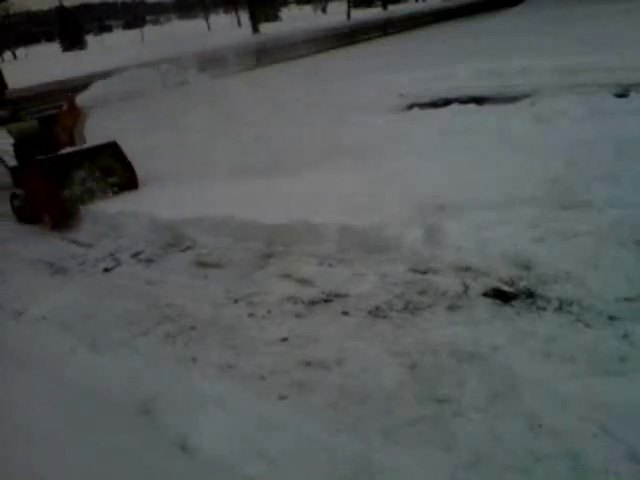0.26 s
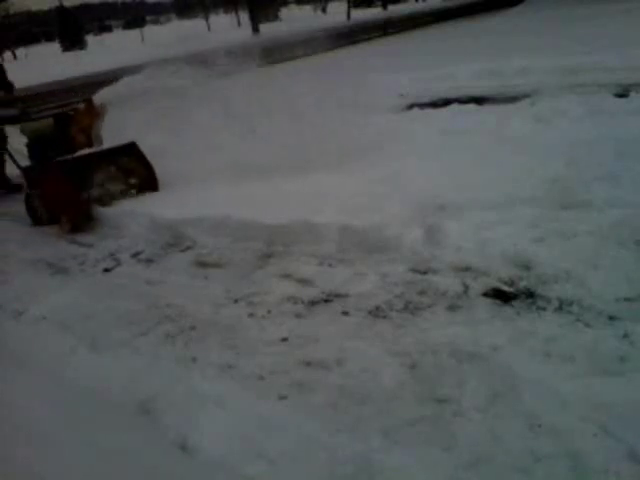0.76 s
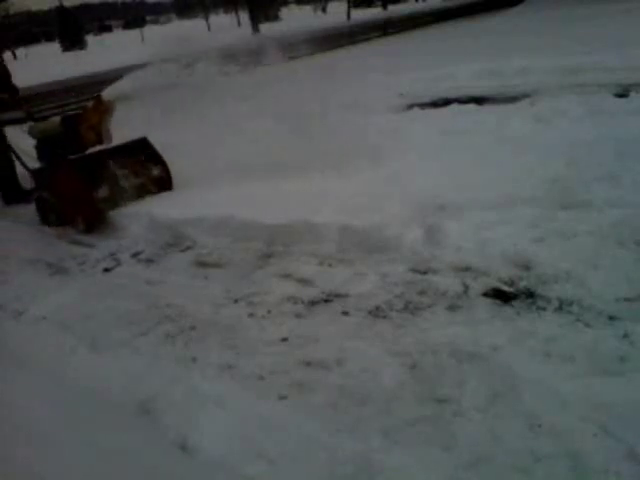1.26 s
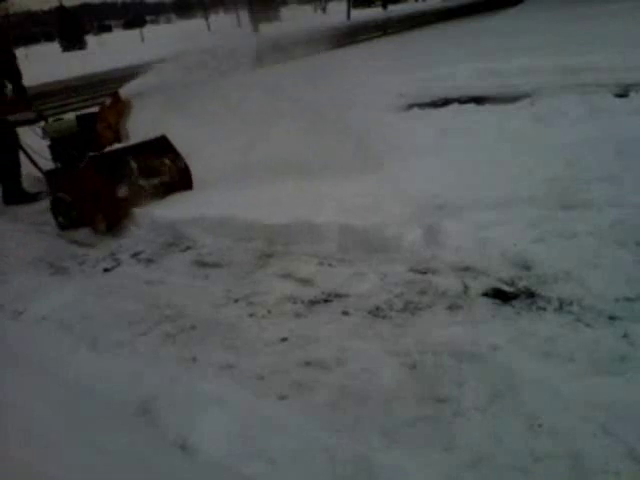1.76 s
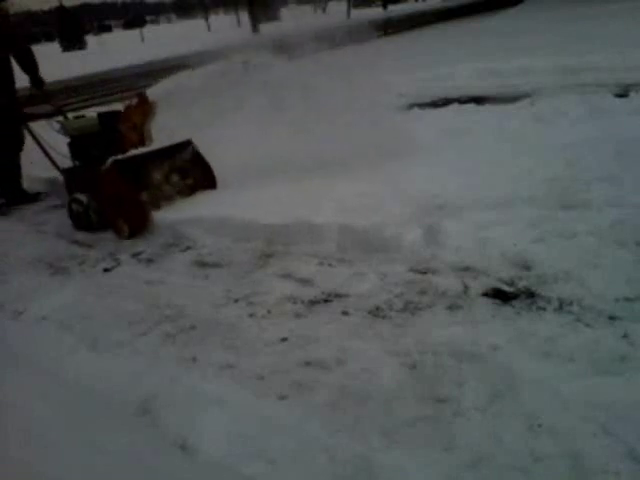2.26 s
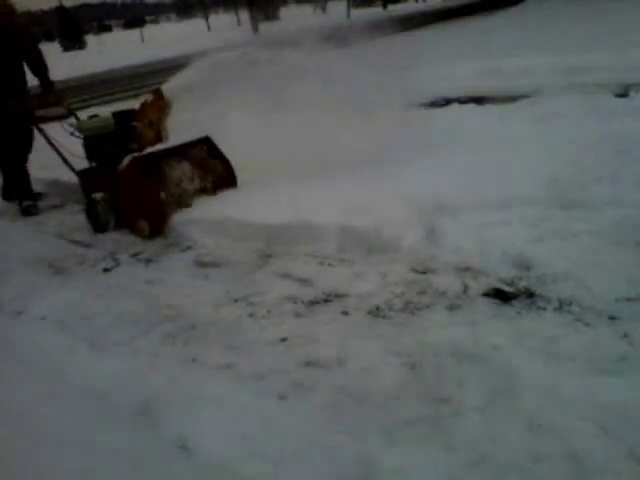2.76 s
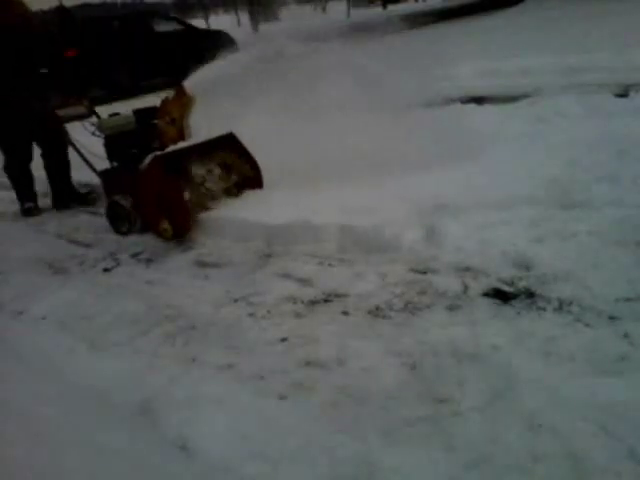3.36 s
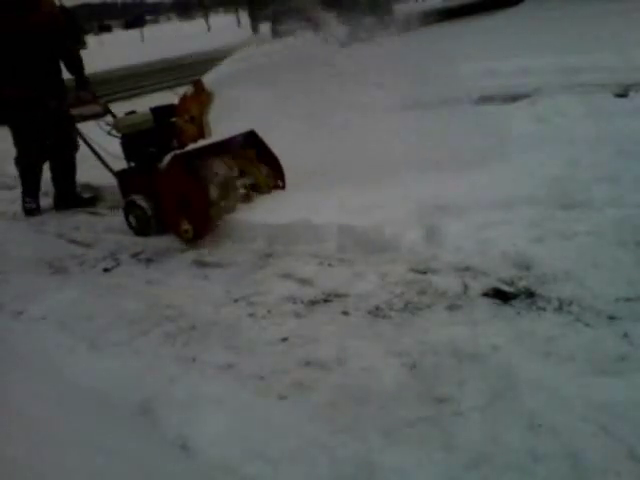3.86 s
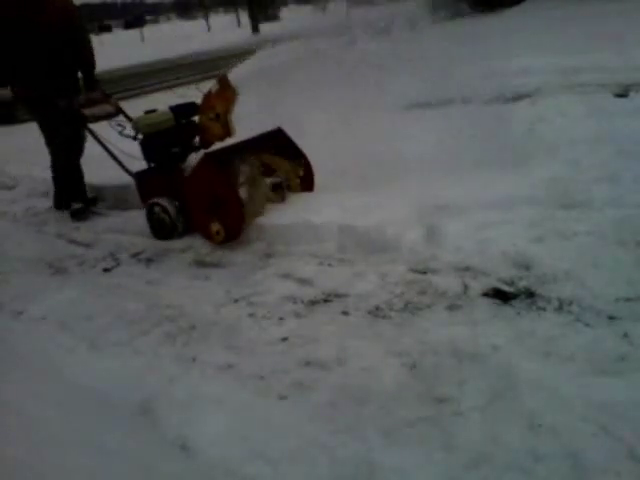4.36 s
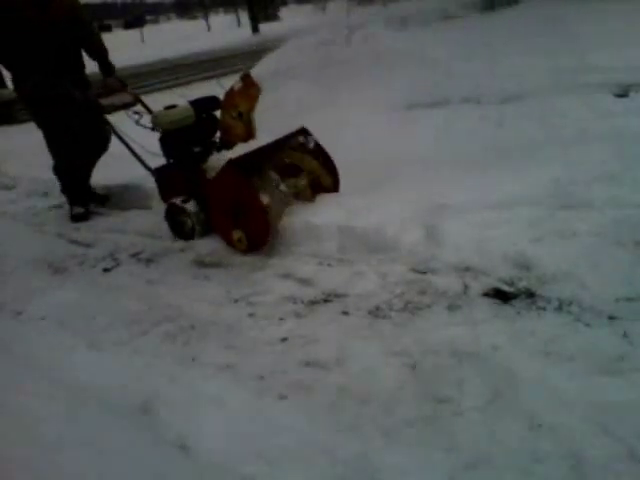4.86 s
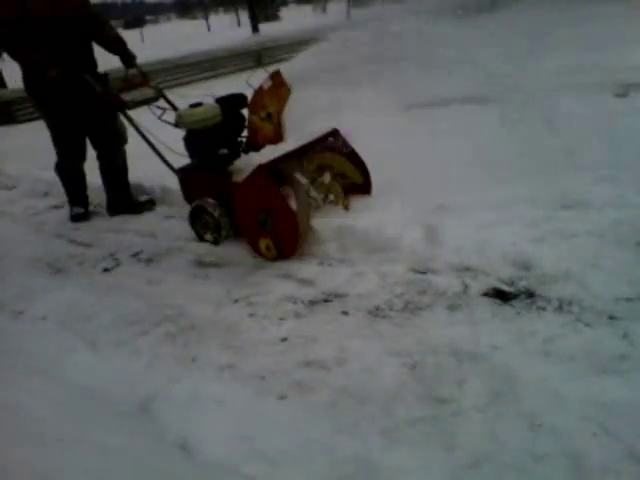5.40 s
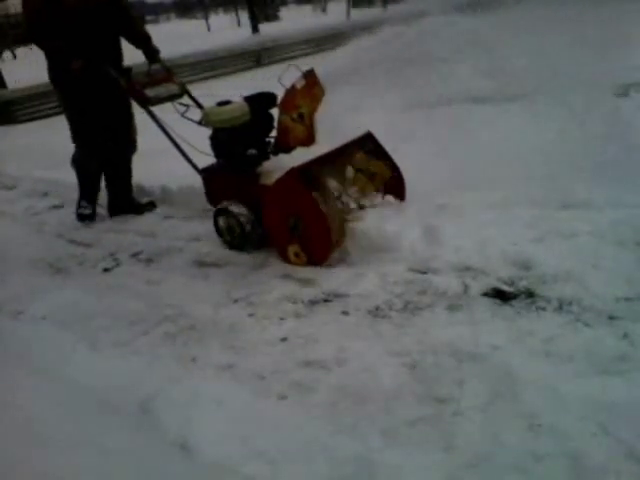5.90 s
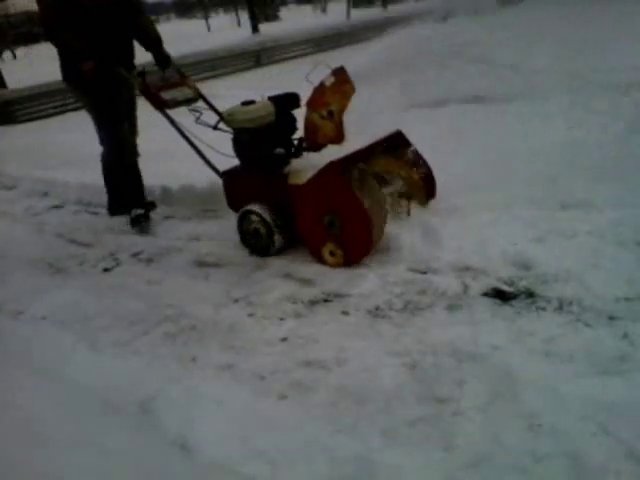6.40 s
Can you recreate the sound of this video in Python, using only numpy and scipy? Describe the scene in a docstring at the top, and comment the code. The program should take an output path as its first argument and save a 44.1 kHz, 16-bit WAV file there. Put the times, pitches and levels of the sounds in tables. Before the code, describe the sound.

A snowblower runs outdoors for the whole six and a half seconds, with no echo and slightly dull treble. Its one-cylinder petrol engine chugs rapidly, with bright valve clatter and a low hum, its speed wavering slightly at first. Snow continuously rumbles in the auger, drums on the steel housing and hisses from the chute, over faint scraping and irregular thuds of lumps. Ice cracks against the steel right at the start, then in a ringing cluster from 0.6 to 0.9 seconds, with lighter clicks until 1.4. A soft gust brushes the microphone around 1.7 seconds. From about 2 seconds the machine grows louder as it approaches, and the engine steadies by 4. Sharp ice clinks come near 2.9 and 4 seconds. The closer machine then ploughs on through thumping lumps, with a few bright snaps of grit around 6 seconds, still running at the end.

```python
"""A two-stage snowblower works its way closer along a driveway, out of doors.
From the start its one-cylinder four-stroke engine hunts on the governor, valves clacking and impeller
humming, while snow churns through the steel housing, lumps thud and the chute hisses. Ice clanks on
the steel in the first 1.5 s, then a light gust passes. More ice hits near 3 and 4 s as the engine
steadies and the machine draws close; it ploughs on through lumps, with a few snaps of grit near 6 s."""
import sys
import numpy as np
from scipy import signal
from scipy.fft import rfft, irfft
from scipy.io import wavfile
from scipy.ndimage import map_coordinates

SR = 44100
rng = np.random.default_rng(int(sys.argv[2]) if len(sys.argv) > 2 else 0)


def log_audio(samples):
    """Write samples as a 16-bit WAV file to the path given in sys.argv[1]."""
    # one column per channel
    frames = np.atleast_2d(samples).T
    # limit to full scale, then quantise
    limited = np.clip(frames, -1, 1)
    pcm = np.round(limited * 32767).astype(np.int16)
    wavfile.write(sys.argv[1], SR, pcm)


N = 292824
TIME = np.arange(N) / SR
CUTOFF_HZ, ICE_RISE_S = 9700, 0.0014

# the speed the governor aims at, sagging a little under load: time_s, firings_per_s
GOVERNOR_SPEED = [(0.0, 31.72), (2.4, 31.72), (3.5, 31.62), (4.6, 31.76), (6.64, 31.62)]
# ice hitting steel, ringing most near the struck spot's pitch: start_s, level_db, t60_s, ring_db, spot_hz
ICE_HITS = [(0.0055, -8, 0.0078, -3.5, 4100), (0.0694, -29.5, 0.014, 13, 4000),
            (0.611, -24, 0.05, -13, 5600), (0.619, -16.5, 0.049, 7, 5600), (0.631, -32, 0.063, 3, 4400),
            (0.64, -26, 0.085, 5, 3800), (0.675, -36, 0.035, -1, 4300), (0.69, -27, 0.025, 2, 2950),
            (0.699, -41, 0.064, 21.5, 2950), (0.7594, -24, 0.095, 1, 5700), (0.777, -18, 0.053, 3, 3700),
            (0.788, -29, 0.062, 5, 4470), (0.8, -30, 0.071, 1, 4700), (0.8144, -15.5, 0.034, 4, 3660),
            (0.919, -34, 0.089, -9, 4300), (1.251, -25.5, 0.077, -7, 4300), (1.27, -27.5, 0.035, 0, 3700),
            (1.35, -28, 0.11, -14, 4300), (1.398, -32, 0.042, -3, 3700), (2.403, -26.5, 0.13, -6, 4330),
            (2.882, -17, 0.078, -12, 4400), (2.893, -14.5, 0.032, 0, 4330), (2.932, -21, 0.06, 12, 4800),
            (2.944, -28, 0.03, 19, 2900), (3.952, -20, 0.054, -15, 4300), (3.961, -20, 0.11, 9, 4270),
            (4.015, -30.5, 0.13, 3, 6450), (4.05, -29, 0.06, -8, 4300), (4.083, -29, 0.02, 6, 4300)]


def engine_cycles(hunt_hz=1.83, crest_s=1.96):
    """Running count of firings: the governor hunts round its target speed, then settles."""
    # depth of the hunting: time_s, swing_firings_per_s
    hunt_depth = [(0.0, 0.3), (2.5, 0.35), (3.8, 0.07)]
    hunting = in_time(hunt_depth) * np.cos(2 * np.pi * hunt_hz * (TIME - crest_s))
    return np.cumsum(in_time(GOVERNOR_SPEED) + hunting) / SR


def exhaust(cycle, near_db, waver=0.14, puff_db=-45, beam_hz=330, opens=0.64, bass_lag_rad=150):
    """Each firing sends one pressure pulse, and a puff of gas, through the muffler."""
    # harmonics of the exhaust note: firing_multiple, level_db
    harmonics = [(1, -47), (2, -38), (3, -42), (4, -38.5), (5, -37), (6, -39.5), (7, -40.5), (8, -47),
                 (9, -47), (10, -47), (11, -46), (12, -47), (13, -44), (14, -43.5), (15, -42), (16, -38),
                 (17, -49), (19, -46), (23, -44.5), (24, -41.5), (26, -43.5), (29, -49), (34, -47)]
    # muffler resonances: pitch_hz, width_hz, level_db
    muffler_modes = [(238, 48, -0.5), (430, 120, 1), (530, 56, 14), (776, 32, -4)]
    note = 0
    for k, db in harmonics:
        # the bass spreads all round; higher harmonics gain more as the machine draws level
        facing = min(k * GOVERNOR_SPEED[0][1] / beam_hz, 1.4)
        strength = from_db(db + facing * near_db) * (1 + waver * drift(4.6))
        # the muffler holds the bass back behind the bark
        note += strength * np.sqrt(2) * np.cos(2 * np.pi * k * (cycle - opens) + bass_lag_rad / k)
    firings = once_a_cycle(cycle, at=0.73, spread_db=2.5)
    gas = fade(firings, t60=0.0051) * rng.standard_normal(N)
    return note + cut(body(gas, muffler_modes), 170, "high") * from_db(puff_db + near_db)


def valves(cycle, clack_db=-40.5, second_db=-11, tick_db=-46, play_cycles=0.018):
    """Loose valve gear gives a bright tick, a hard clack and a lighter one in every cycle."""
    # valve cover resonances: pitch_hz, width_hz, level_db
    cover_modes = [(4220, 214, 0.5), (4710, 390, -6.5), (5470, 180, -14.5)]
    # tappet resonances: pitch_hz, width_hz, level_db
    tappet_modes = [(5500, 560, -11.5), (6510, 98, 4)]
    loose = cycle + play_cycles * drift(22)
    tick, first, second = [once_a_cycle(loose, at, spread_db=2.3) for at in (0.37, 0.39, 0.62)]
    clacks = first + from_db(second_db) * second
    rattle = cut(fade(clacks, t60=0.025), 300, "low", order=1) * rng.standard_normal(N)
    ticks = cut(fade(tick, t60=0.02), 300, "low", order=1) * rng.standard_normal(N)
    cover = from_db(clack_db) * rms_one(cut(body(rattle, cover_modes), 3380, "high", order=5))
    tappet = from_db(tick_db) * rms_one(cut(body(ticks, tappet_modes), 5000, "high", order=4))
    return wander(cover + tappet, share=0.009, rate_hz=22)  # no two clacks ring alike


def impeller(cycle, blades_per_firing=2.2035, waver=0.18):
    """The belt-driven blades hum a little above the crank rate and beat with it."""
    # partials of the hum: blade_multiple, level_db
    blade_tones = [(1, -45.5), (2, -45)]
    phase = 2 * np.pi * blades_per_firing * cycle
    return sum(from_db(db) * np.sqrt(2) * (1 + waver * drift(5.4)) * np.sin(k * phase)
               for k, db in blade_tones)


def snow(cycle, near_db, rumble_db=-33, clatter_db=-26, spray_db=-33, shake=0.11):
    """Snow rumbles in the auger, drums on the engine-shaken housing and sprays from the chute."""
    # how much snow the auger takes in: time_s, gain_db
    intake = [(0, -0.5), (0.25, 4), (0.53, -2.5), (0.75, 3), (1.15, 5.5), (1.55, 0.5), (1.8, 2),
              (2.15, 0.5), (2.45, 2), (2.7, -1.5), (3.0, 0), (3.8, -0.5), (4.75, -1.5), (5.1, 0.5),
              (5.75, 2), (6.2, 2), (6.64, -1.5)]
    # spectrum of snow tumbling in the auger: frequency_hz, level_db
    rumble_spectrum = [(20, -28.5), (60, -19), (105, -6.5), (150, -5), (240, 4.5), (300, -0.5), (360, -8.5),
                       (600, -16.5), (1200, -37)]
    # steel housing resonances: pitch_hz, width_hz, level_db
    housing_modes = [(316, 175, -8), (480, 146, -1), (600, 175, -2), (764, 79.7, 6), (822, 134, 3),
                     (939, 101.6, 1.5), (1080, 52, 0), (1240, 250, -11.5), (1647, 66, -11),
                     (1877, 310, -16)]
    # spectrum of snow hissing through the chute: frequency_hz, level_db
    spray_spectrum = [(1200, -15), (1900, -7), (2350, -19), (2650, -12.5), (2930, -3), (3200, -9),
                      (3550, -4), (3950, 0.5), (4330, 10.5), (4800, 1.5), (5250, -2.5), (5700, 4),
                      (6100, -1), (6550, -1.5)]
    load_db = in_time(intake)
    auger_gain = from_db(rumble_db + 0.15 * near_db + 1.76 * drift(18))
    housing_gain = from_db(clatter_db + near_db + load_db)
    chute_gain = from_db(spray_db + 1.02 * near_db + 0.25 * load_db)
    feed = 1 + shake * np.cos(2 * np.pi * (cycle - 0.55))  # throbs with each firing
    rumble = colour(grains(per_s=1800, spread_db=3.5) * feed, rumble_spectrum)
    drumming = grains(per_s=2400, spread_db=2) * feed * from_db(1.26 * drift(28))
    # shifting snow moves the housing's resonances
    panels = wander(body(drumming, housing_modes), share=0.014, rate_hz=7)
    clatter = rms_one(cut(panels, 1904, "low", order=8))
    hiss = colour(rng.standard_normal(N), spray_spectrum)
    spray = rms_one(cut(hiss, 1100, "high")) * from_db(0.78 * drift(16))
    return rumble * auger_gain + clatter * housing_gain + spray * chute_gain


def lumps(length_s=0.3, attack_s=0.025, band_octaves=1.12, sink_octaves_per_s=12, thump_below_hz=380):
    """Packed lumps break into a rattle as their crust crunches; heavy ones land with a sinking thump."""
    # thuds deep in the auger, knocks higher on the housing: start_s, level_db, pitch_hz, crust_offset_db
    lump_hits = [(0.008, -23.5, 980, -6), (0.27, -32, 206, -9), (0.331, -28.5, 740, -10),
                 (0.352, -27.5, 617, -20), (0.398, -27, 195, -30), (0.649, -29.5, 507, -21),
                 (0.677, -30, 360, -20), (0.762, -27.5, 850, -7), (0.811, -32.5, 1020, -0.5),
                 (0.924, -23.5, 287, -15.5), (1.012, -25, 940, -21), (1.244, -29.5, 970, -12),
                 (1.268, -22.5, 800, -11), (1.278, -28, 193, -12), (1.3, -33, 900, -3),
                 (1.396, -31.5, 217, -7), (1.683, -29.5, 960, -5.5), (1.692, -34, 295, -17),
                 (1.696, -24, 740, -10), (1.756, -27, 740, -18), (1.76, -29.5, 296, -21),
                 (1.803, -32, 940, -9), (1.867, -31, 194, -21), (2.33, -32, 163, -26),
                 (2.378, -27, 886, -13), (2.482, -26.5, 274, -30), (2.571, -26.5, 240, -20),
                 (2.889, -23, 790, -5.5), (2.895, -33, 186, -26), (2.937, -30.5, 820, -25),
                 (3.522, -24.5, 165, -19), (3.726, -27.5, 805, -29), (3.956, -25, 910, -18),
                 (4.268, -26.5, 199, -30), (4.3, -28.5, 206, -20), (4.544, -22, 282, -26),
                 (4.586, -24.5, 616, -32), (4.622, -30, 370, -26), (4.782, -24.5, 400, -29),
                 (4.848, -25, 157, -22), (4.898, -24.5, 216, -20), (4.958, -28.5, 810, -19),
                 (5.04, -31, 620, -24), (5.113, -23, 730, -28), (5.129, -23.5, 696, -28),
                 (5.315, -31, 220, -24), (5.375, -27, 720, -14), (5.497, -24.5, 890, -25),
                 (5.524, -26.5, 206, -28), (5.602, -28.5, 198, -20), (5.76, -28, 188, -26),
                 (5.915, -26.5, 760, -24), (6.075, -30, 180, -24), (6.135, -25.5, 825, -22),
                 (6.165, -23.5, 710, -18), (6.225, -27, 850, -18), (6.33, -40, 990, -24)]
    size, attack = int(length_s * SR), int(attack_s * SR)
    envelope = blow(0, rise=0.005, t60=0.077)[:size]
    # the thump drops in pitch as the lump squashes
    sinking = np.cumsum(2 ** (-sink_octaves_per_s * (TIME[:size] - attack_s / 2))) / SR
    out = np.zeros(N + size)
    for s, db, hz, crust_offset_db in lump_hits:
        thump = envelope * np.sin(2 * np.pi * hz * sinking)
        pieces, flakes = envelope * rng.standard_normal((2, size)) * ragged((2, size), spread_db=4)
        band_hz = hz * 2 ** (np.array([-0.5, 0.5]) * band_octaves)
        rattle = cut(cut(pieces, band_hz, "band"), 1130, "low", order=6)
        thump_share = 0.55 / (1 + (hz / thump_below_hz) ** 4)
        knock = np.sqrt(thump_share) * thump / np.std(thump[:attack])
        knock += np.sqrt(1 - thump_share) * rattle / np.std(rattle[:attack])
        crust = cut(cut(flakes, 1300, "high", order=3), 1860, "low", order=8)
        start = int(s * SR)
        for part, part_db in (knock, db), (crust, db + crust_offset_db):
            out[start:start + size] += from_db(part_db) * part / np.std(part[:attack])
    return out[:N]


def ice(treble_db=3, trickle_db=-19):
    """Each bit of ice shatters against the steel in a crunchy burst, and its splinters trickle after."""
    # spectrum of the shatter: frequency_hz, level_db
    crack_spectrum = [(300, -4), (800, 2.5), (1400, -3), (2000, -3.5), (2400, -16.5), (2900, -2),
                      (3500, -1), (4350, 4), (5150, -6), (5700, 2.5), (6050, -7.5), (6550, 5.5),
                      (7200, -8.5), (9300, -2)]
    shatter = cut(colour(grains(per_s=3500, spread_db=1), crack_spectrum), 350, "high")
    treble = signal.sosfiltfilt(signal.butter(3, 5000, "high", fs=SR, output="sos"), shatter)
    envelope = 0
    for s, db, t60, *_ in ICE_HITS:
        trickle = from_db(trickle_db) * blow(s, rise=0.018, t60=0.3)
        envelope += from_db(db) * (blow(s, ICE_RISE_S, t60) + trickle)
    return envelope * (shatter + (from_db(treble_db) - 1) * treble)


def steel_ring(spread_db=1.5, fall_db_per_octave=41, detune_share=0.009):
    """Ice sets the steel ringing; clinging snow shifts each mode's pitch from hit to hit."""
    # modes of the steel chute and auger: pitch_hz, level_db, t60_s
    steel_modes = [(2935, -8, 0.05), (2990, -14, 0.07), (3360, -14, 0.025), (3720, -4, 0.035),
                   (4300, 0, .033), (4700, -3, .033), (5600, -4, 0.022), (6450, -4, .02)]
    age = TIME[:SR // 4]
    hz, mode_db, t60 = np.transpose(steel_modes)[:, :, None]
    envelopes = np.minimum(age / ICE_RISE_S, 1) * from_db(mode_db - 60 * age / t60)
    out = np.zeros(N + len(age))
    for s, db, _, ring_db, spot_hz in ICE_HITS:
        strength, detune = rng.standard_normal((2, len(steel_modes), 1))
        octaves_off = np.abs(np.log2(hz / spot_hz))
        gain = from_db(db + ring_db + spread_db * strength - fall_db_per_octave * octaves_off)
        tones = np.sin(2 * np.pi * hz * (1 + detune_share * detune) * age)
        start = int(s * SR)
        out[start:start + len(age)] += np.sum(gain * envelopes * tones, axis=0)
    return out[:N]


def grit():
    """Small stones snap off the auger, short and bright."""
    # stone snaps: start_s, level_db
    snaps = [(0.69, -23), (2.887, -17.5), (4.242, -29), (6, -22.5), (6.042, -26), (6.102, -30)]
    envelope = sum(from_db(db) * blow(s, rise=0.001, t60=0.072) for s, db in snaps)
    return envelope * rms_one(cut(cut(rng.standard_normal(N), 4800, "high"), CUTOFF_HZ, "low"))


def scraper(scrape_db=-46, catch_db=3.5):
    """The scraper bar grinds unevenly over packed snow, breaking its crust into dense grains."""
    crust = grains(per_s=2700, spread_db=4)
    crunch = rms_one(cut(cut(crust, 840, "high", order=3), 1560, "low", order=8))
    return crunch * from_db(scrape_db - catch_db * drift(6.5))


def chute_ring(near_db, ring_db=-54, flurry_db=4):
    """Splinters brush the chute in flurries, so its ring comes and goes."""
    splinters = from_db(flurry_db * drift(9)) * rng.standard_normal(N)
    return from_db(ring_db + near_db) * rms_one(resonate(splinters, hz=2930, width_hz=120))


def wind(gust_db=6.5):
    """Light wind buffets the microphone, soft and lumpy."""
    # a lull, then one gust that dies away: time_s, level_db
    breeze = [(0, -32), (1.3, -47), (1.7, -31), (2.3, -34), (3.6, -39.5), (4.4, -42)]
    # spectrum of the buffeting: frequency_hz, level_db
    buffet_spectrum = [(12, -6), (30, -12), (55, -4.5), (90, -8.5), (160, -5), (400, -35)]
    gusts = from_db(in_time(breeze) + gust_db * drift(1.8))
    return gusts * colour(rng.standard_normal(N), buffet_spectrum)


def from_db(db):
    """Decibels to gain."""
    return 10 ** (np.asarray(db) / 20)


def rms_one(x):
    """Scale to rms 1."""
    return x / np.sqrt(np.mean(x ** 2) + 1e-20)


def in_time(points):
    """A breakpoint curve's value at every sample."""
    return np.interp(TIME, *np.transpose(points))


def drift(rate_hz):
    """Smooth random motion up to about this rate; rms 1."""
    spectrum = rfft(rng.standard_normal(N))
    hz = np.arange(len(spectrum)) * SR / N
    return rms_one(irfft(spectrum / (1 + (hz / rate_hz) ** 4), N))


def wander(x, share, rate_hz):
    """Let a sound's resonances stray by this share of their pitch."""
    lead = drift(rate_hz)
    positions = np.arange(N) + share * lead / np.std(np.diff(lead))
    return map_coordinates(x, [positions], order=3, mode="mirror")


def colour(x, points):
    """Shape a steady sound with an EQ curve; rms 1."""
    hz, db = np.transpose(points)
    bins_hz = np.maximum(np.arange(N // 2 + 1) * SR / N, 1)
    gain = from_db(np.interp(np.log(bins_hz), np.log(hz), db))
    return rms_one(irfft(rfft(x) * gain, N))


def cut(x, hz, kind, order=2):
    """Butterworth low-, high- or band-pass."""
    return signal.sosfilt(signal.butter(order, hz, kind, fs=SR, output="sos"), x)


def resonate(x, hz, width_hz):
    """One resonance, gain 1 at its peak."""
    r = np.exp(-np.pi * width_hz / SR)
    feedback = [1, -2 * r * np.cos(2 * np.pi * hz / SR), r * r]
    return signal.lfilter(np.array([1, 0, -1]) * (1 - r * r) / 2, feedback, x + 1e-18)


def body(x, modes):
    """Resonances in parallel, signs alternating; rms 1."""
    return rms_one(sum((-1) ** k * from_db(db) * resonate(x, hz, width_hz)
                       for k, (hz, width_hz, db) in enumerate(modes)))


def ragged(shape, spread_db):
    """Random gains: most near 1, a few much louder."""
    return from_db(spread_db * np.minimum(rng.exponential(1, shape), 3))


def grains(per_s, spread_db):
    """Random small impacts of uneven size."""
    return (rng.random(N) < per_s / SR) * rng.choice([-1, 1], N) * ragged(N, spread_db)


def once_a_cycle(cycle, at, spread_db):
    """A click of uneven strength each time the engine passes this share of its cycle."""
    clicks = np.diff(np.floor(cycle - at), prepend=np.floor(-at))
    return clicks * from_db(spread_db * rng.standard_normal(N))


def fade(clicks, t60):
    """The dying envelope that each click leaves."""
    return signal.lfilter([1], [1, -from_db(-60 / (t60 * SR))], clicks + 1e-18)


def blow(start_s, rise, t60):
    """Envelope of one hit: a quick rise, then decay."""
    age = np.maximum(TIME - start_s, 0)
    return np.minimum(age / rise, 1) * from_db(-60 * np.clip((age - rise) / t60, 0, 3))


def scene():
    """The machine, the snow it throws and the wind, in mono; snow-covered ground gives no echo."""
    # the machine comes closer: time_s, gain_db
    approach = [(0, -5.5), (1.5, -8.5), (2.7, -4.5), (4.1, 0), (5.6, -1.5), (6.64, 1)]
    near_db = in_time(approach)
    cycle = engine_cycles()
    machine = exhaust(cycle, near_db) + valves(cycle) * from_db(near_db) + impeller(cycle)
    churn = snow(cycle, near_db) + chute_ring(near_db) + scraper()
    impacts = ice() + steel_ring() + grit() + lumps()
    return (machine + churn + impacts + wind())[None]


def record(dry, rolloff_hz=6900, edge_hz=7200, air_db=-21):
    """A small camera's tone: the treble drops at a steep edge, with only a trace of air above it."""
    edge = signal.ellip(10, 0.2, 80, edge_hz, fs=SR, output="sos")
    ceiling = signal.ellip(12, 0.2, 90, CUTOFF_HZ, fs=SR, output="sos")
    dulled = signal.sosfilt(edge, cut(dry, rolloff_hz, "low", order=12))
    air = from_db(air_db) * cut(dry, 8640, "high", order=8)
    return signal.sosfilt(ceiling, dulled + air)


dry = scene()
out = record(dry)
log_audio(out)
```